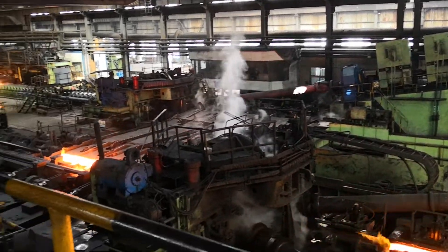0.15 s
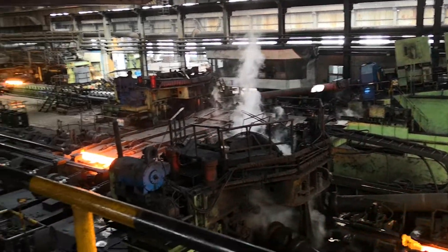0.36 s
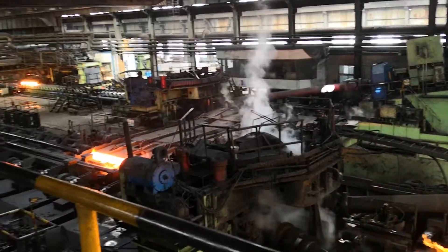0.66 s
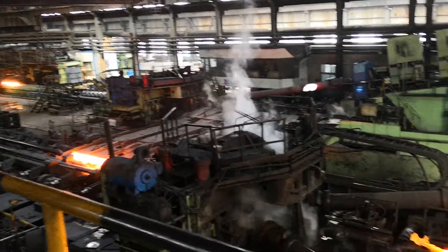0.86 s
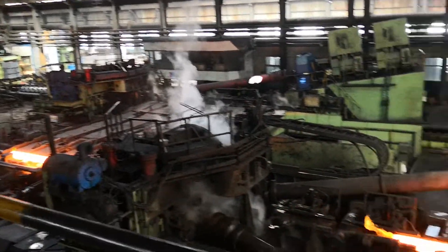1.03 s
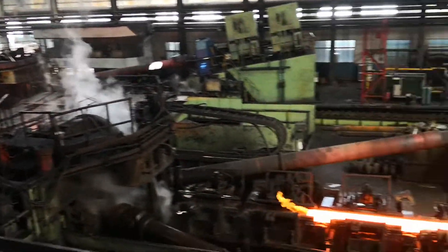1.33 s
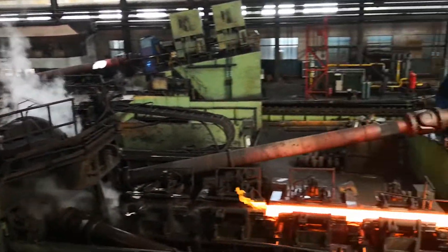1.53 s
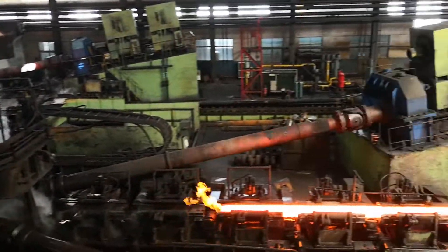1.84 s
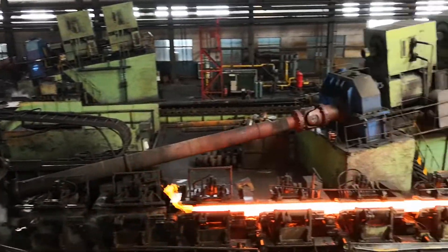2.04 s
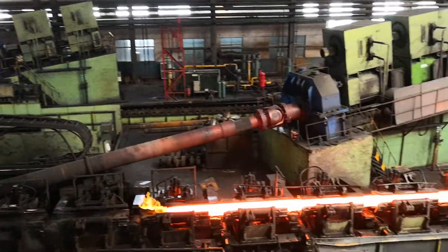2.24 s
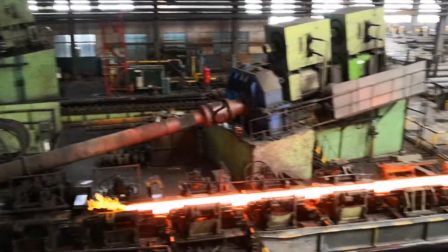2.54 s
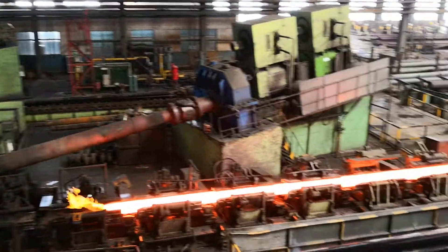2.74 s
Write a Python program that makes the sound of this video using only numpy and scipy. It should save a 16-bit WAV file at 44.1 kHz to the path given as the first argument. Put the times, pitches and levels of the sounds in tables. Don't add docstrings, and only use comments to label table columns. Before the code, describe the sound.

Hot steel bar rumbles over rollers in a huge factory hall, machinery roaring, steam hissing, metal squeaking

```python
import sys
import numpy as np
from scipy import signal
from scipy.fft import rfft, irfft
from scipy.io import wavfile
from scipy.ndimage import uniform_filter1d, minimum_filter1d

SR = 44100
rng = np.random.default_rng(int(sys.argv[2]) if len(sys.argv) > 2 else 0)


def elevation(decibels):
    levels = np.asarray(decibels, float)
    return 10 ** (levels / 20)


def inscribe(sig):
    pcm = np.round(np.clip(np.atleast_2d(sig).T, -1, 1) * 32767)
    wavfile.write(sys.argv[1], SR, pcm.astype(np.int16))


N = 127008
T = np.arange(N) / SR
HZ = np.fft.rfftfreq(N, 1 / SR) + 1e-3


def at_hz(points, hz):
    table_hz, value = np.transpose(points)
    return np.interp(np.log(hz), np.log(table_hz), value)


def over_time(points):
    return np.interp(T, *np.transpose(points))


def drift(rate):
    r = np.exp(-80 * np.pi * rate / SR)
    noise = rng.standard_normal(N // 40 + 2002)
    slow = signal.lfilter([1], [1, -2 * r, r * r], noise)[2000:]
    slow = (slow - slow.mean()) / slow.std()
    return np.interp(np.arange(N) / 40, np.arange(len(slow)), slow)


def tone(hz, width_hz):
    wander_per_s = 8
    pitch = hz + width_hz * np.array([drift(wander_per_s), drift(wander_per_s)])
    start_phase = rng.uniform(0, 2 * np.pi, (2, 1))
    return np.sqrt(2) * np.sin(2 * np.pi * np.cumsum(pitch, axis=1) / SR + start_phase)


def puff(middle_s, length_s, hz, octaves):
    band = np.exp(-.5 * (np.log2(HZ / hz) / octaves) ** 2)
    noise = irfft(rfft(rng.standard_normal((2, N))) * band, N)
    return noise / noise.std() * np.exp(-2 * ((T - middle_s) / length_s) ** 2)


# time in seconds, turn from 0 to 1.
TURN = [(0, 0.2), (.12, 0.22), (.65, 0), (.9, 0.36), (1.2, 0.9), (1.6, 0.84), (2.1, .8), (2.88, 1)]


def turned():
    return over_time(TURN)


# frequency in Hz, change in dB.
TURN_GAIN = [(200, -1), (500, -1), (900, 6), (1500, -0.5), (2500, .5), (4500, 0), (7500, -3), (12000, -2.5)]


def din(spectrum, slow_db, fast_db, fast_hz):
    low, high = spectrum[0][0], spectrum[-1][0]
    shape = elevation(at_hz(spectrum, HZ)) * (HZ > low) * (HZ < high) * np.sqrt(SR / 2)
    noise = rfft(rng.standard_normal((2, N))) * shape
    turn, together, out = turned(), drift(fast_hz), np.zeros((2, N))
    slice_octaves = .4
    for hz in low * 2 ** np.arange(0, 6, slice_octaves):
        if hz < high * 1.3:
            mask = np.cos(np.pi / 2 * np.clip(np.log2(HZ / hz) / slice_octaves, -1, 1)) ** 2
            flicker = 0.34 * together + 0.49 * drift(fast_hz)
            gain_db = at_hz(TURN_GAIN, hz) * (turn - .5) + slow_db * drift(1.77) + fast_db * flicker
            out += elevation(gain_db) * irfft(noise * mask, N)
    return out


# frequency in Hz, level in dB per Hz.
AIR = [(10270, -130), (10330, -95), (10500, -85), (10800, -86.5), (12000, -89.5), (14000, -89.5),
       (15000, -91), (16000, -95)]


def air():
    return din(AIR, slow_db=.4, fast_db=1.0, fast_hz=16)


# frequency in Hz, level in dB per Hz.
DRIVES = [(20, -74), (45, -61), (90, -52), (170, -46), (300, -47), (400, -50.5), (600, -56.5), (1000, -69)]


def drives():
    return din(DRIVES, slow_db=0.1, fast_db=0.05, fast_hz=10)


# pitch in Hz, wander in Hz, level in dB rms.
HUMS = [(98, 2, -42), (145, 3, -38), (173.5, 2, -35.5), (347.5, 2, -36), (520, 6, -40), (588, 3, -38),
        (954, 5, -41), (2350, 8, -39)]


def hums():
    return sum(elevation(db + 2.5 * drift(3.5)) * tone(hz, width_hz) for hz, width_hz, db in HUMS)


# time in seconds, level in dB rms.
LOAD = [(0, -50), (.2, -30), (.45, -29.5), (.62, -28), (.8, -42), (1.2, -32), (1.5, -29), (1.75, -36),
        (1.92, -26.5), (2.1, -41), (2.45, -30), (2.88, -37)]


def loaded_drive():
    return elevation(over_time(LOAD)) * tone(293, width_hz=4)


# frequency in Hz, level in dB per Hz.
STEAM = [(4500, -79.5), (6200, -72), (7000, -67), (7600, -63.5), (8000, -66), (8400, -76.5), (9000, -83),
         (9250, -130)]


def steam():
    return din(STEAM, slow_db=.5, fast_db=0.75, fast_hz=22)


# middle in seconds, pitch in Hz.
SPITS = [(.5, 9250), (.82, 9300), (1.32, 9500), (1.72, 9300), (1.88, 9400), (1.88, 9950), (2.05, 9900),
         (2.15, 9850), (2.3, 9800), (2.39, 9300), (2.4, 9900), (2.55, 9350), (2.62, 9900), (2.71, 9400),
         (2.71, 9950), (2.84, 9400), (2.86, 10000)]


def spits():
    return elevation(-62) * sum(puff(middle_s, .022, hz, octaves=.018) for middle_s, hz in SPITS)


# frequency in Hz, level in dB per Hz.
SCALE = [(2500, -76), (3100, -56), (3600, -58), (3900, -58), (4500, -64.5), (5200, -68.5), (6200, -72),
         (7000, -81)]


def scale():
    return din(SCALE, slow_db=1.0, fast_db=.5, fast_hz=19)


# middle in seconds, length in seconds, centre in Hz, level in dB rms.
SURGES = [
    (.06, .14, 1650, -18.5),
    (1.22, .1, 2300, -30),
    (2.17, .14, 1750, -21),
    (2.4, .15, 1900, -25),
    (1.95, .1, 2500, -27),
    (1.1, .15, 700, -30),
]


def surges():
    return sum(elevation(db) * puff(middle_s, length_s, hz, octaves=.25) for middle_s, length_s, hz, db in SURGES)


# start in seconds, pitch in Hz, length in seconds, level in dB rms.
RINGS = [(.155, 2350, .08, -26), (.145, 2885, .04, -27), (.252, 2905, .06, -27), (.265, 6800, .03, -41),
         (.55, 5380, .035, -35), (1.168, 2350, .04, -20), (1.183, 2905, .02, -28), (1.2, 2110, .022, -21),
         (1.242, 2535, .025, -21), (1.685, 2350, .04, -24), (2.315, 2090, .045, -21), (.96, 4825, .03, -42),
         (1.33, 173, .27, -30), (1.96, 2435, .05, -27), (2.21, 6955, .03, -43), (.505, 5400, .045, -43),
         (.27, 2350, .03, -26), (1.225, 2350, .025, -24), (2.32, 2500, .03, -29)]


def rings():
    rise_s, fall_s, width_hz, extra_db = .01, .012, 6, 1.5
    out = np.zeros((2, N))
    for start, hz, length, db in RINGS:
        rise = np.sin(np.pi / 2 * np.clip((T - start) / rise_s, 0, 1)) ** 2
        fall = np.exp(-np.maximum(T - start - length, 0) / fall_s)
        out += elevation(db + extra_db) * rise * fall * tone(hz, min(width_hz, hz / 100))
    return out


# frequency in Hz, level in dB per Hz.
ROLLERS = [(350, -57), (600, -52), (900, -49), (1350, -53), (1700, -48.5), (2500, -47.5), (2900, -51),
           (3100, -60)]


def rollers():
    return din(ROLLERS, slow_db=0.26, fast_db=0.2, fast_hz=10)


# frequency in Hz, difference in dB.
SHADOW = [(100, 0), (300, -2), (600, -7), (1200, -6.5), (2400, -12.5), (4500, -8), (7500, -4.5),
          (8150, -15.5)]
# frequency in Hz, difference in dB.
SHADOW_TOP = [(8200, 0), (8330, -40), (9200, -40), (9300, 12), (15000, 12)]
# frequency in Hz, likeness from 0 to 1.
LIKENESS = [(150, 0.98), (300, 0.92), (600, 0.63), (1100, 0.35), (2200, 0.46), (3200, 0.37), (5000, 0.14),
            (9000, .05)]
# frequency in Hz, lag in radians.
LAG = [(0, 0), (200, .5), (340, 1.0), (600, 3.0), (1450, 7), (2450, 9.5), (4400, 16.5), (16000, 55)]
# frequency in Hz, change in dB.
TURN_LEFT = [(300, 0), (900, 2), (2000, 0.5), (4000, 0), (7500, 2.5), (12000, 5)]


def ports(pair):
    first, second = rfft(pair)
    alike = np.clip(at_hz(LIKENESS, HZ), 0, 1)
    lag = np.exp(-1j * np.interp(HZ, *np.transpose(LAG)))
    shadow = elevation(at_hz(SHADOW, HZ) + at_hz(SHADOW_TOP, HZ))
    left = shadow * (alike * lag * first + np.sqrt(1 - alike ** 2) * second)
    turn, change = turned(), elevation(at_hz(TURN_LEFT, HZ) / 2)
    turned_away, turned_to = irfft(left / change, N), irfft(left * change, N)
    return np.array([(1 - turn) * turned_away + turn * turned_to, pair[0]])


def scene():
    background = air() + drives() + hums() + loaded_drive()
    water = steam() + spits()
    bar = scale() + surges() + rings() + rollers()
    return ports(background + water + bar)


def top_cut(x):
    return signal.sosfilt(signal.butter(12, 15140, fs=SR, output="sos"), x)


def record(dry):
    ceiling, limit_s = .8, .004
    span = int(limit_s * SR)
    needed = np.minimum(1, ceiling / (np.abs(dry).max(axis=0) + 1e-9))
    gain = minimum_filter1d(needed, size=2 * span)
    gain = uniform_filter1d(uniform_filter1d(gain, size=span), size=span)
    return top_cut(dry * gain)


dry = scene()
out = record(dry)
inscribe(out)
```